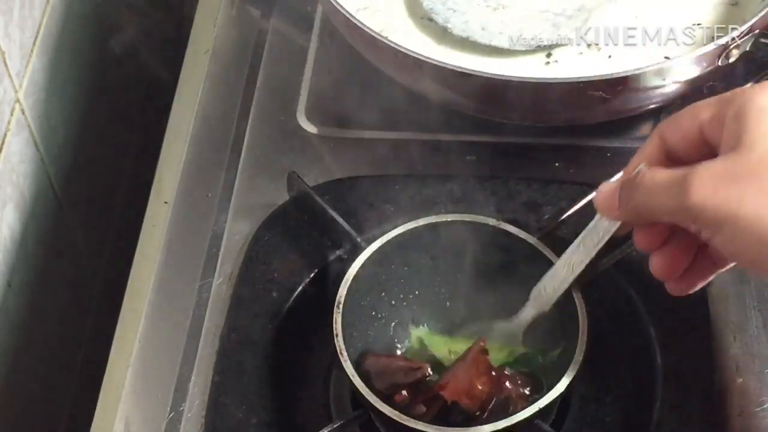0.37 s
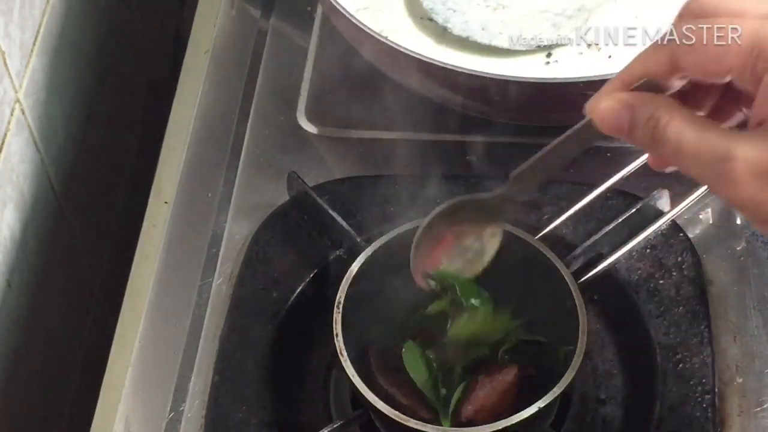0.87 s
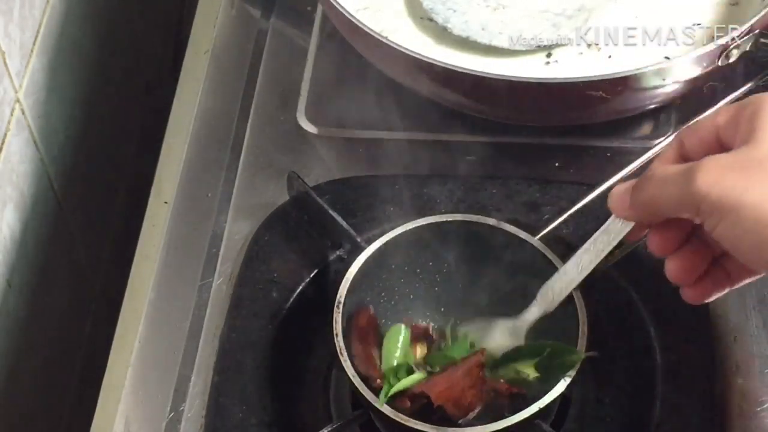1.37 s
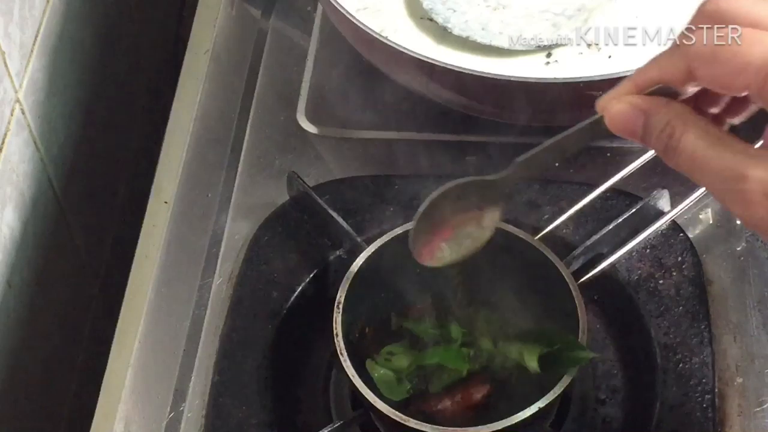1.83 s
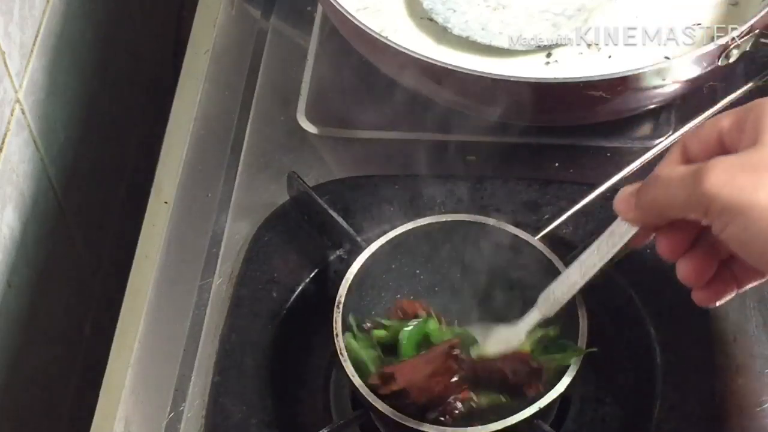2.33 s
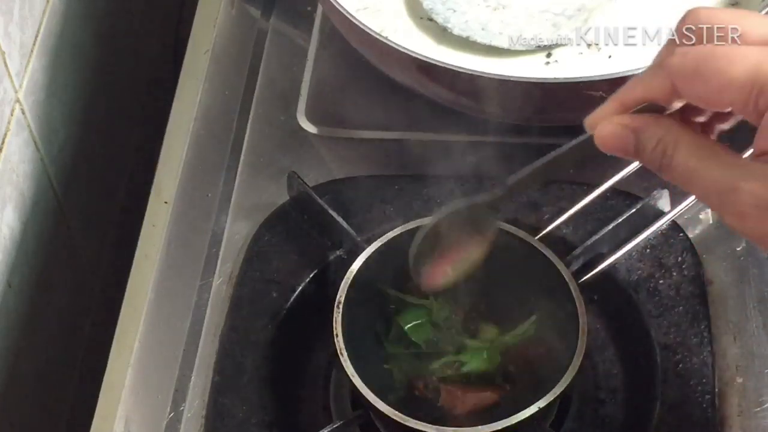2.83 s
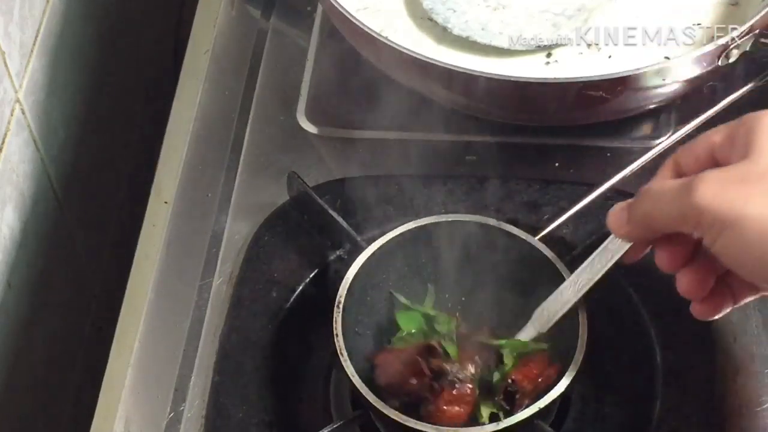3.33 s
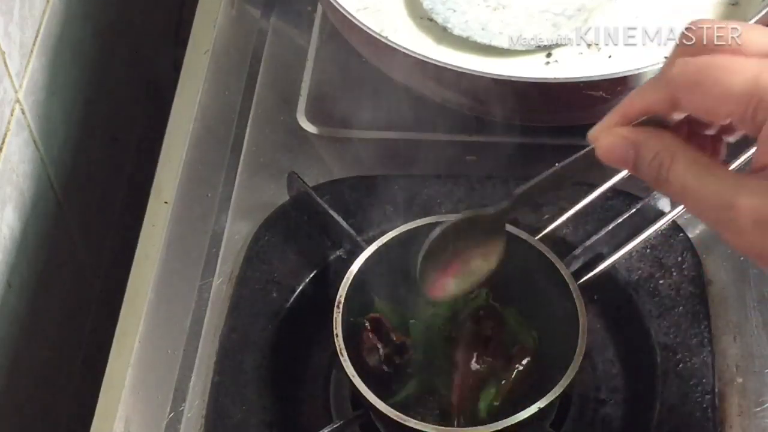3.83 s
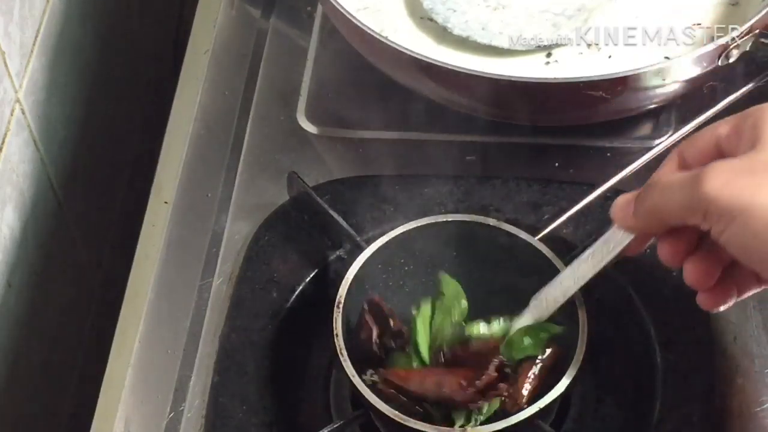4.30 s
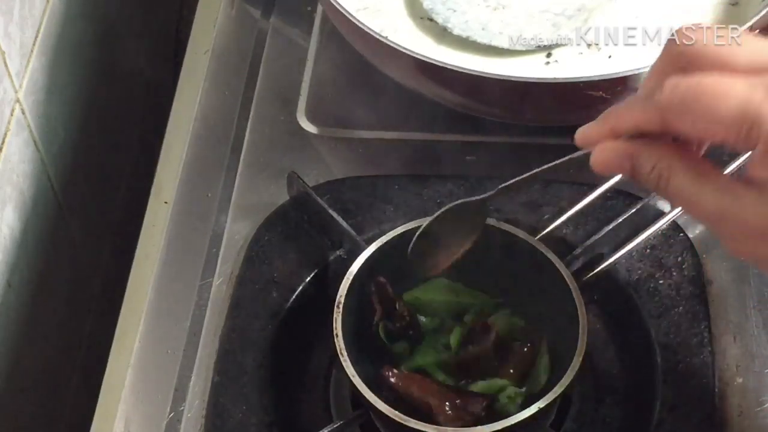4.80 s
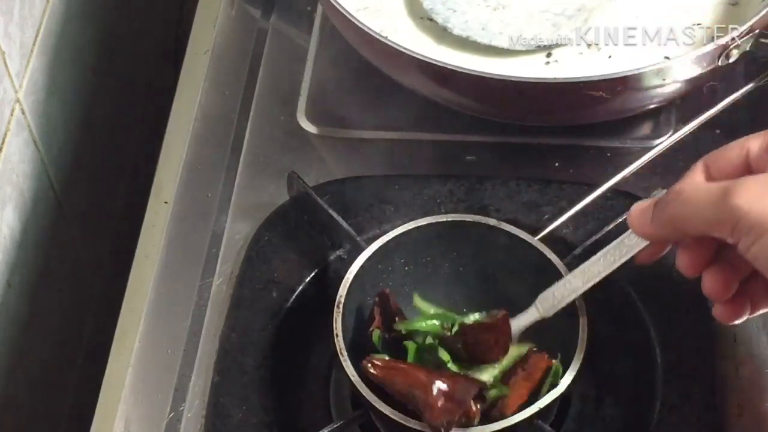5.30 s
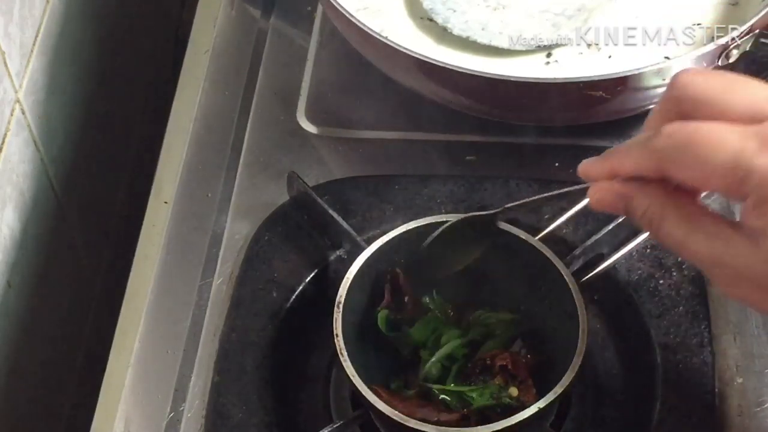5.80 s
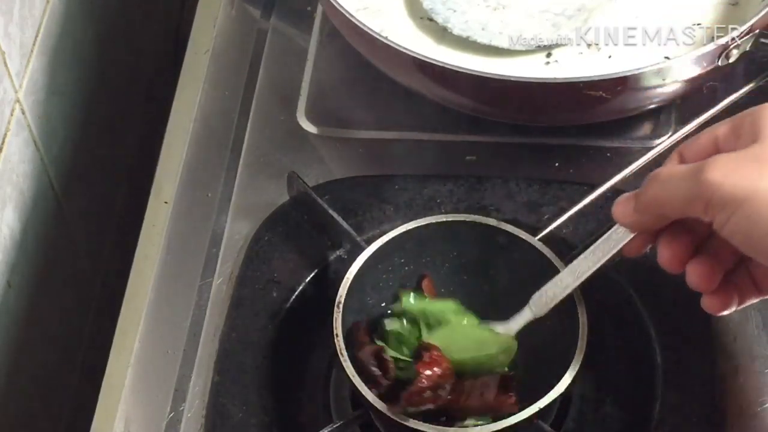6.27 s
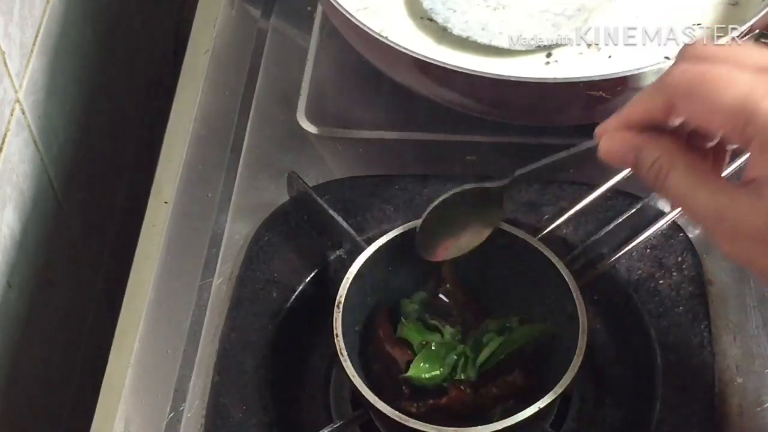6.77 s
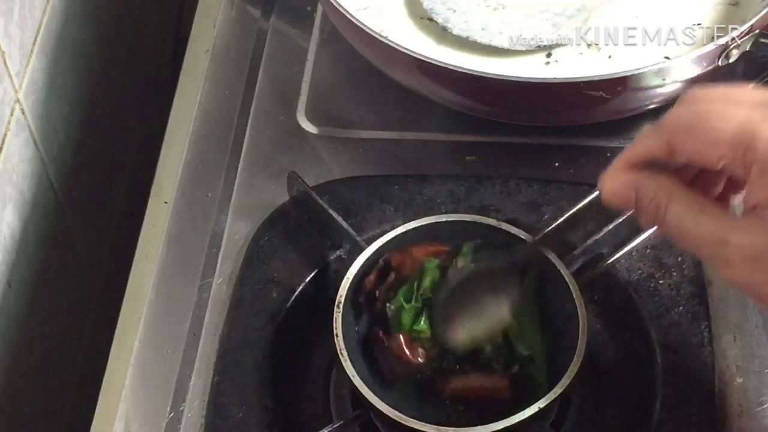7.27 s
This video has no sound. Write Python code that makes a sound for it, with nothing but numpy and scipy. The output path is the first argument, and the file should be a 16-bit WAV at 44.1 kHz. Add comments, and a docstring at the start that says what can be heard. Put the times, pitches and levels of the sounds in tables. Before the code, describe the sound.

A scrap of quieter frying fades out, a tiny gap follows, then loud sizzling of wet leaves and chillies in hot oil swells in. Sharp pops and short steam hisses burst through it. About once a second a metal spoon knocks and grates along the small pan, making it ring. After five seconds the frying weakens to sparse crackle. A low fan rumbles; close phone microphone, mono, small softly echoing kitchen.

```python
"""Leaves and spices fry in hot oil in a small steel pan: shaped noise and tiny damped sines make a dense fizz
of bursting steam bubbles, with single pops and steam jets, that dies down towards the end.
About once a second a spoon digs along the pan: a knock and uneven slips ring the pan and its stand.
A fan rumbles as low noise with three tones, and the kitchen echoes softly. All of it is mono, close to a
phone microphone. A shot with quieter frying fades out first; after a short silence the main one fades in."""
import sys
import numpy as np
from scipy import signal
from scipy.fft import rfft, irfft, next_fast_len
from scipy.io import wavfile
from scipy.ndimage import uniform_filter1d, map_coordinates

SR = 44100
rng = np.random.default_rng(int(sys.argv[2]) if len(sys.argv) > 2 else 0)


def unload_wav(signal):
    """Save mono or channel-first audio to the path in sys.argv[1] as 16-bit WAV at rate SR, clipped to [-1, 1]."""
    wavfile.write(
        sys.argv[1],
        SR,
        np.round(np.clip(np.atleast_2d(signal).T, -1, 1) * 32767).astype(np.int16),
    )


def voltage_ratio(level):
    """Linear amplitude factor for a level in decibels (scalar or array-like)."""
    return 10 ** (np.asarray(level, float) / 20)


N = 325899  # length in samples
CUT_S = 0.12  # the first shot ends here


def unit(x):
    """Scales a sound to an rms (average strength) of 1."""
    return x / np.sqrt(np.mean(x ** 2) + 1e-20)


def along(points, hz):
    """Reads (Hz, value) points as a curve on a logarithmic pitch axis."""
    f, v = np.transpose(points)
    return np.interp(np.log(hz + 1), np.log(f + 1), v)


def curves(rows):
    """Turns each column after the time into one value per sample."""
    s, *cols = np.transpose(rows)
    return [np.interp(np.arange(N) / SR, s, c) for c in cols]


def wobble(rate):
    """A smooth random curve with `rate` random knots a second."""
    knots = rng.standard_normal(int(N * rate / SR) + 4)
    return map_coordinates(knots, [np.arange(N) * rate / SR])


def filtered(x, response):
    """Multiplies the spectrum of x by a response that depends on frequency."""
    m = next_fast_len(N + 8192)  # spare room at the end for ringing
    return irfft(rfft(x, m) * response(np.fft.rfftfreq(m, 1 / SR)), m)[..., :N]


def coloured(x, spectrum):
    """Shapes x by (Hz, dB) points, then scales it to rms 1."""
    return unit(filtered(x, lambda hz: voltage_ratio(along(spectrum, hz))))


def modes(table):
    """Response of a body that rings at several pitches; a narrower width rings longer."""
    def response(f):
        total = 0
        for k, (centre, width, db) in enumerate(table):
            ring = 1j * f * width / (centre * centre - f * f + 1j * f * width)
            total = total + (-1) ** k * voltage_ratio(db) * ring  # neighbours swing in opposite directions
        return total
    return response


def held(t, attack_s, hold_s, release_db_per_s):
    """Gain that rises, holds and dies away; t counts from the start."""
    rise = np.clip(t / attack_s, 0, 1)
    return rise * voltage_ratio(-release_db_per_s * np.clip(t - attack_s - hold_s, 0, None))


def patchy(depth_db):
    """Noise whose level drifts in patches of time and pitch."""
    z = signal.stft(rng.standard_normal(N), nperseg=256)[2]
    field = uniform_filter1d(rng.standard_normal(z.shape), size=8, axis=0)
    field = uniform_filter1d(field, size=10, axis=1)
    return unit(signal.istft(z * voltage_ratio(depth_db * unit(field)), nperseg=256)[1][:N])


def sputter(count, life_s):
    """Gain that jumps when a steam pocket opens and dies away as it empties."""
    u = rng.random((count, 2))
    kicks = np.bincount((u[:, 0] * N).astype(int), -np.log(u[:, 1] + .01), N)
    return signal.lfilter([1], [1, -np.exp(-1 / (life_s * SR))], kicks)


def bursts(s, db, hz, cycles, size):
    """Damped sines of a few cycles, one per bursting bubble."""
    t = np.arange(size) / SR
    phase = hz[:, None] * t
    wave = voltage_ratio(db)[:, None] * np.sin(2 * np.pi * phase) * np.exp(-phase / cycles[:, None])
    at = np.round(s * SR).astype(int)[:, None] + np.arange(size)
    return np.bincount(at.ravel(), wave.ravel(), N + size)[:N]


def crackle(count, hz, octaves, cycles, spread_db):
    """Random bubble bursts: many small, few large."""
    u = rng.random((count, 3))
    pitch = np.clip(hz * 2 ** (octaves * rng.standard_normal(count)), 200, SR / 2.5)
    size_db = -spread_db * np.log(u[:, 1] + .004)
    return unit(bursts(u[:, 0] * N / SR, size_db, pitch, cycles * (.5 + u[:, 2]), size=160))


def lift_wandering_band(x, centre_hz, lift_db, octaves):
    """Makes one band of x louder while the centre of that band wanders in pitch."""
    hz, t, z = signal.stft(x, SR, nperseg=256)
    centre = np.interp(t, np.arange(N) / SR, centre_hz)
    away = np.log2((hz[:, None] + 1) / centre) / octaves
    return unit(signal.istft(z * voltage_ratio(lift_db * np.exp(-away ** 2)), SR, nperseg=256)[1][:N])


# how hard the oil boils, before the steady peaks colour it: # t/s, fizz level/dB, big bubbles level/dB relative
# to fizz, fine spit level/dB relative to fizz
FRYING = [(.33, -22, -7.5, -2.5), (.54, -20.5, -7, -2.5), (.68, -23.5, -8, -1.5), (1.0, -25, -7, -2),
          (1.4, -21, -8.5, -2.5), (1.7, -24, -5.5, 0), (2.0, -21.5, -5.5, -3.5), (2.3, -23, -9, -2.5),
          (2.45, -22, -7.5, -3.5), (2.63, -26, -4.5, -1.5), (2.65, -18.5, -6, -2.5), (3.15, -20, -8, -3),
          (3.52, -21, -8.5, -4.5), (3.69, -25.5, -5.5, -0.5), (4.15, -25, -8.5, -5.5), (4.6, -26, -6, 0),
          (5.05, -28.5, -7, -7.5), (5.3, -27, -7, -3), (5.75, -31, -6, -6.5), (5.93, -37, -4, -8),
          (6.25, -31.5, -5, -6), (6.6, -39, -7.5, -4), (6.9, -41.5, -6.5, -6), (7.0, -35.5, -7, 0),
          (7.2, -44, -4.5, -5), (7.39, -38.5, -15, 0)]
# relative tone colour of the big bubbles: f/Hz, level/dB
BUBBLES = [(260, -55), (450, -22), (571, -10.5), (778, -5), (912, -8.5), (1200, -10), (1600, 1.5),
           (2100, -4.5), (2250, 0), (3000, -12.5), (3900, -2.5), (6600, -120)]
# relative tone colour of the middle-sized bubbles: f/Hz, level/dB
FIZZ = [(1180, -16.5), (2000, -14), (2670, 1), (4030, -3), (4910, 3), (5360, -1), (8000, -3.5),
        (10400, -9.5), (17600, -120)]
# relative tone colour of the fine spit: f/Hz, level/dB
SPIT = [(3530, -39), (6000, -4), (6690, -0.5), (8030, -4), (9000, -1), (11100, -5), (12000, -7.5),
        (15000, -9.5), (15800, -17)]
# narrow steady peaks in the tone of the frying: f/Hz, width/Hz, lift/dB (held to 7 dB at most when played)
STEADY_PEAKS = [(912, 47, 10.5), (1310, 12, 4), (1430, 25, 5), (1676, 55, 4), (1650, 29, 0.5), (1900, 20, 1),
                (2010, 12, 7), (2320, 24, 2), (2220, 14, 3.5), (2620, 38, 0), (2810, 55, -6.5), (2973, 25, 2),
                (3240, 29, 0.5), (3470, 31, 0.5), (3820, 40, -4.5), (4440, 97, -2), (4900, 220, -1), (5755, 67, 4),
                (6490, 63, 1.5)]


def frying():
    """Three bubble sizes share one boiling vigour, each a sputtering hiss with bursts; narrow steady peaks
    colour them."""
    wander_hz, wander_octaves = 3900, 0.1  # loudest band of the fizz
    flicker_db = 0.44  # unsteady level of each bubble size
    steady_db, fitful_per_db = -24, .12  # below this fizz level, extra flicker for each dB lost
    earlier_db = -23.5  # the first shot fries this much lower

    fizz_db, bubble_db, spit_db = curves(FRYING)
    centre_hz = wander_hz * 2 ** (wander_octaves * wobble(16))
    fitful_db = fitful_per_db * np.clip(steady_db - fizz_db, 0, None)
    flicker = [voltage_ratio(flicker_db * wobble(14) + fitful_db * wobble(35)) for _ in range(3)]
    surge_db = fizz_db + 0.14 * wobble(25)
    shared = 0.26 * sputter(count=300, life_s=0.0034)  # pockets heard in every size

    def hiss(share):
        """Patchy noise kicked by the shared steam pockets and by pockets of its own."""
        return unit(patchy(depth_db=1.5) * (1 + shared + share * sputter(count=400, life_s=.005)))

    big_bursts = crackle(count=4000, hz=1833, octaves=0.54, cycles=1.8, spread_db=3.0)
    big = coloured(hiss(0.18) + 0.23 * big_bursts, BUBBLES)
    mid_bursts = crackle(count=6000, hz=4116, octaves=0.528, cycles=1.6, spread_db=2)
    mid = coloured(hiss(0.39) + 0.43 * mid_bursts, FIZZ)
    mid = lift_wandering_band(mid, centre_hz, lift_db=3.5, octaves=0.73)
    fine_bursts = crackle(count=8000, hz=8800, octaves=0.42, cycles=3.1, spread_db=4)
    fine = coloured(hiss(0.24) + 0.36 * fine_bursts, SPIT)

    oil = voltage_ratio(bubble_db) * flicker[0] * big + flicker[1] * mid + voltage_ratio(spit_db) * flicker[2] * fine
    oil = voltage_ratio(surge_db) * oil + steam_jets(hiss(0.1))
    oil = oil * np.where(np.arange(N) < CUT_S * SR, voltage_ratio(earlier_db), 1)

    def peak_colour(f):
        return voltage_ratio(sum(min(db, 7) / (1 + (2 * (f - c) / w) ** 2) for c, w, db in STEADY_PEAKS))

    return filtered(oil, peak_colour)


# relative tone colour of the fan's rumble: f/Hz, level/dB
FAN = [(7.1, -34), (12, 4), (27, 2), (49, -4), (86, -14.5), (147, -15.5), (168, -33.5), (196, -18),
       (318, -24.5), (424, -36), (485, -25), (524, -28), (1200, -50), (1560, -75), (2640, -120)]
# hum tones of the fan: f/Hz, level/dB (2 dB lower when played)
FAN_TONES = [(129.2, -65), (199.2, -50.5), (360.7, -57.5)]


def fan():
    """Low noise whose level drifts slightly, with tones unsteady in level and phase."""
    t = np.arange(N) / SR
    tones = 0
    for hz, db in FAN_TONES:
        level = voltage_ratio(db - 2.0 + 2.4 * wobble(9.7))
        tones = tones + level * np.sin(2 * np.pi * hz * t + 1.35 * wobble(6))
    rumble = voltage_ratio(-34 + 0.55 * wobble(2.04)) * coloured(rng.standard_normal(N), FAN)
    return rumble + tones


# how long the room's echo takes to fall by 60 dB: f/Hz, t/s
KITCHEN = [(300, 0.17), (3000, 0.16), (12000, 0.14)]


def kitchen(x):
    """Each frequency of the room's answer dies at its own speed."""
    hz, t, z = signal.stft(rng.standard_normal(SR // 3), SR, nperseg=256)
    fade = voltage_ratio(-60 * t / along(KITCHEN, hz)[:, None])
    tail = signal.istft(z * fade, SR, nperseg=256)[1]
    late = np.pad(x, (150, 0))  # the echo starts 150 samples late
    return signal.fftconvolve(late, tail / np.linalg.norm(tail))[:N]


# loud bursts; the rows at 5.1225 s and 7.3664 s are echoes off the stove top, a few ms after the pop before
# them: t/s, level/dB at the start before the burst dies away, f/Hz
POPS = [(.0428, -21.5, 8800), (.322, -7, 4760), (.366, -9, 4650), (.406, -8, 4290), (1.224, -10, 2800),
        (1.819, -11, 2200), (2.419, -11, 3130), (2.647, -10, 5500), (3.074, -5, 8500), (3.4116, 0, 5600),
        (3.9758, -3, 8060), (4.243, -10, 4550), (4.947, -10, 8000), (5.038, -7, 5200), (5.0988, -2.5, 4920),
        (5.1163, -4.5, 8600), (5.1225, -7, 5900), (5.1876, -11, 4970), (5.205, -12, 6600),
        (5.3157, -13, 8300), (5.331, -14.5, 1720), (5.369, -10, 2620), (5.7695, -10, 7200),
        (5.991, -15, 9500), (6.0, -16, 7500), (6.021, -15, 9000), (6.039, -17, 9000), (6.075, -16, 8800),
        (6.1518, -14, 4570), (6.1957, -18, 3600), (6.2956, -15, 3070), (6.3784, -15.5, 2130),
        (6.4562, -22.5, 7300), (6.4953, -21, 4650), (6.5421, -22.5, 1860), (6.5969, -15, 7500),
        (6.6864, -17, 4500), (6.7798, -24, 9500), (6.908, -23, 3200), (6.9418, -13, 4900),
        (6.9778, -17.5, 2900), (7.0154, -20, 10500), (7.0796, -20, 5820), (7.2464, -24, 5550),
        (7.265, -17, 5040), (7.3612, -15, 3900), (7.3664, -19, 3070)]


def pops():
    """Each burst rings at its pitch with a wide crack, then a short spray of droplets around that pitch."""
    small_pops, small_db, small_spread_db = 700, -30.5, 3  # lesser bursts, with base level and spread
    small_hz, small_octaves = 6500, 0.61  # their middle pitch and its spread
    crack_db, spray_db, spray_t60_s = -3.5, -8, .02  # levels relative to the burst; 60 dB fall time
    spray_octaves, spray_top_hz = 0.42, 12300  # half width of the spray's band and its upper limit

    u, g = rng.random((small_pops, 2)), rng.standard_normal(small_pops)
    small_s = CUT_S + u[:, 0] * (N / SR - CUT_S)
    small_level_db = small_db - small_spread_db * np.log(u[:, 1] + .05)
    small_pitch = np.clip(small_hz * 2 ** (small_octaves * g), 1500, 11000)
    rows = np.vstack([POPS, np.transpose([small_s, small_level_db, small_pitch])])

    s, db, hz = rows.T
    out = bursts(s, db, hz, np.full(len(s), 2.5), size=400)
    out += bursts(s, db + crack_db, np.full(len(s), 5500.), np.full(len(s), .6), size=40)
    t = np.arange(SR // 20) / SR
    for start, level_db, centre_hz in rows:
        low_hz = centre_hz * 2 ** -spray_octaves
        high_hz = min(centre_hz * 2 ** spray_octaves, spray_top_hz)
        band = signal.butter(2, (low_hz, high_hz), "bandpass", fs=SR)
        spray = unit(signal.lfilter(*band, rng.standard_normal(len(t))))
        spray = spray * voltage_ratio(level_db + spray_db - 60 * t / spray_t60_s)
        i = round(start * SR)
        out[i:i + len(t)] += spray[:N - i]
    return out


# steam jets from wet leaves meeting the oil, before the steady peaks colour them: # start t/s, hold t/s,
# level/dB, starting f/Hz
JETS = [(0.33, 0.19, -23.5, 4440), (0.596, 0.014, -29, 2600), (1.302, .04, -22.5, 4200),
        (1.494, 0.053, -29, 1760), (1.798, 0.02, -26, 2400), (1.898, 0.071, -25, 3730),
        (2.328, 0.08, -24.5, 3000), (3.296, 0.14, -22, 3324), (3.872, 0.02, -26.5, 3504),
        (4.285, .2, -25.5, 3258), (4.675, .02, -23.5, 4580), (4.884, 0.044, -27, 3800),
        (5.358, 0.023, -33, 3000), (6.28, .04, -35, 3250), (6.48, 0.0095, -37, 4350),
        (6.674, 0.015, -35, 4440), (7.25, 0.013, -38, 4870)]


def steam_jets(x):
    """Each jet is a band of the hiss x that sinks in pitch as the pocket empties."""
    attack_s, release_db_per_s = 0.0076, 298
    width_octaves, sag_octaves_per_s = 0.48, 1.7

    hz, t, z = signal.stft(x, SR, nperseg=256)
    power = np.zeros(z.shape)
    for s, hold_s, db, centre_hz in JETS:
        sunk = sag_octaves_per_s * np.clip(t - s, 0, 1)
        band = np.exp(-((np.log2((hz[:, None] + 1) / centre_hz) + sunk) / width_octaves) ** 2)
        gain = voltage_ratio(db) * held(t - s, attack_s, hold_s, release_db_per_s)
        power += band / band.mean(axis=0) * gain ** 2
    return signal.istft(z * np.sqrt(power), SR, nperseg=256)[1][:N]


# spoon strokes: landing t/s, grating level/dB, hold t/s, deep thud level/dB relative to grating,
# scrape above 1.1 kHz level/dB relative to grating
STROKES = [(1.143, -26.5, 0.088, -10, -7), (2.117, -28, 0.09, -3, -14), (3.095, -27.5, 0.013, -1, -9),
           (3.151, -28, 0.045, -9, 1), (4.083, -28.5, 0.088, -6, -5), (4.994, -26.5, 0.072, -3, -6.5),
           (5.941, -25.5, 0.027, -9.5, -3.5), (6.943, -39, 0.073, -12, -2.5)]
# ringing of the pan on its stand: f/Hz, width/Hz, relative level/dB
STAND = [(340, 37, -14.5), (407, 54, -5.5), (513, 17, -3), (535, 16, -1.5), (612, 38, -10), (674, 41, -5.5),
         (810, 34, -5)]
# ringing of the stand on the stove top: f/Hz, width/Hz, relative level/dB
FEET = [(199, 39, -1.5), (238, 21, 4)]
# ringing of the pan under the spoon: f/Hz, width/Hz, relative level/dB
RIM = [(1140, 17, -12), (1290, 30, 4), (1420, 32, 11), (1475, 35, 2), (1790, 36, -9), (2160, 44, 7),
       (2420, 60, 6), (2700, 28, -15)]
# impulse of the landing into stand, feet and rim: level/dB relative to each one's grating
KNOCK_INTO_DB = [44, 46, 43]


def spoon():
    """A knock, then uneven slips shake stand, feet and rim, each with its own ringing pitches."""
    attack_s, sag_db_per_s, release_db_per_s = 0.0031, 22, 152
    thud_fade_db_per_s, scrape_fade_db_per_s = 96, 69  # relative to the grating

    slips = (rng.random(N) < 900 / SR) * rng.standard_normal(N) * voltage_ratio(2.7 * wobble(60))
    slips = unit(slips) + 0.52 * rng.standard_normal(N)
    stand_modes = modes(STAND)

    def stand(f):
        broad_thud = 0.26 / (1 + 1j * f / 900) * 1j * f / (250 + 1j * f)
        return stand_modes(f) + broad_thud

    bodies = stand, modes(FEET), modes(RIM)
    force = np.zeros((3, N))
    for s, grate_db, hold_s, deep_db, scrape_db in STROKES:
        t = np.clip(np.arange(N) / SR - s, 0, None)
        push = voltage_ratio(grate_db - sag_db_per_s * t) * held(t, attack_s, hold_s, release_db_per_s)
        thud = deep_db - thud_fade_db_per_s * t
        scrape = scrape_db - scrape_fade_db_per_s * t
        force += push * voltage_ratio([0 * t, thud, scrape])
    # the slips are scaled so that each body answers them equally strongly
    force *= [slips / np.std(filtered(slips, body)) for body in bodies]
    for s, grate_db, _, deep_db, scrape_db in STROKES:
        force[:, round(s * SR)] += voltage_ratio(grate_db + np.add(KNOCK_INTO_DB, [0, deep_db, scrape_db]))
    return sum(filtered(push, body) for push, body in zip(force, bodies))


def scene():
    """Pan, spoon and fan in the kitchen; one microphone feeds both channels."""
    oil, hits = frying(), pops() + spoon()
    # the pan's wall shades the treble from the room
    round_about = filtered(oil, lambda hz: voltage_ratio(-4.0) / (1 + 1j * hz / 2500))
    echo = kitchen(round_about + voltage_ratio(-6.0) * hits)
    mono = oil + hits + echo + fan()
    return np.array([mono, mono])


def band_limit(x):
    """A steep low-pass at the top of the band."""
    return signal.sosfilt(signal.butter(12, 16170, fs=SR, output="sos"), x)


# fade out of the first shot, silence, fade in of the main one: t/s, gain (0 to 1)
FADE = [(0, 0.82), (.11, 0.12), (.112, 0), (.13, 0), (.16, 0.06), (.2, 0.36), (.32, 0.93)]


def record(dry):
    """Fades between the shots, clips at full scale and removes everything from 15850 Hz up."""
    faded = dry * np.clip(curves(FADE)[0], 0, 1)
    clipped = np.clip(faded, -1, 1)
    finished = filtered(clipped, lambda hz: hz < 15850)
    return band_limit(finished)


dry = scene()
out = record(dry)
unload_wav(out)
```